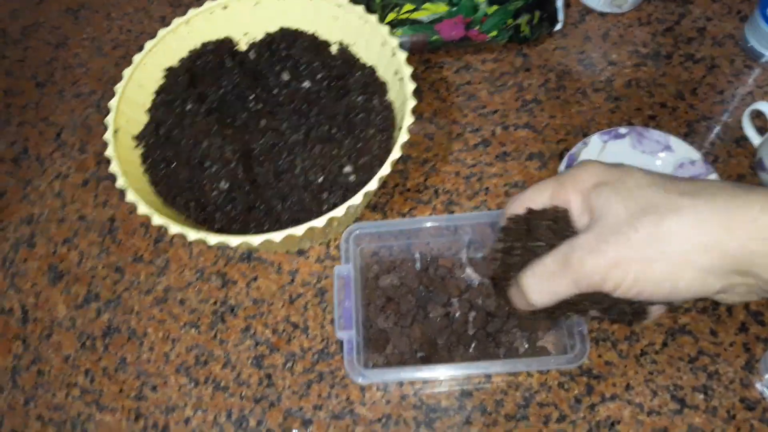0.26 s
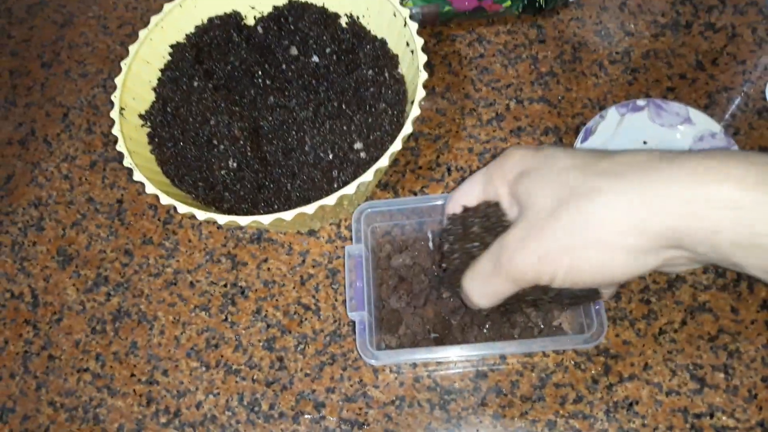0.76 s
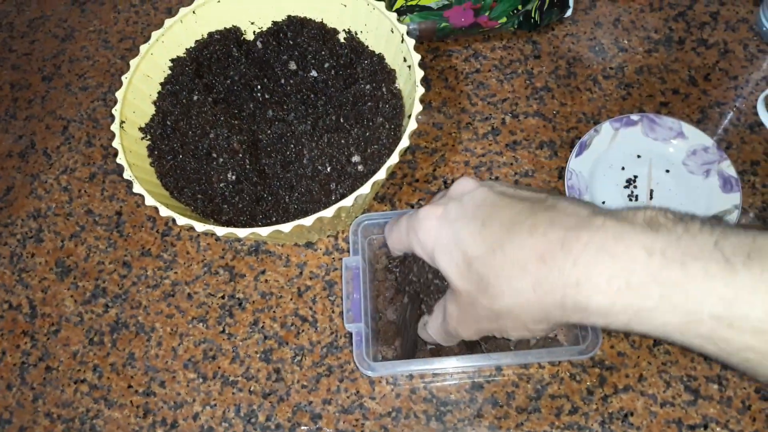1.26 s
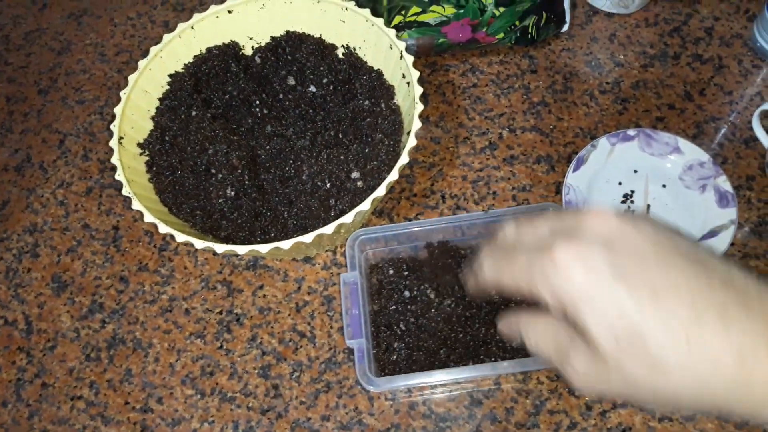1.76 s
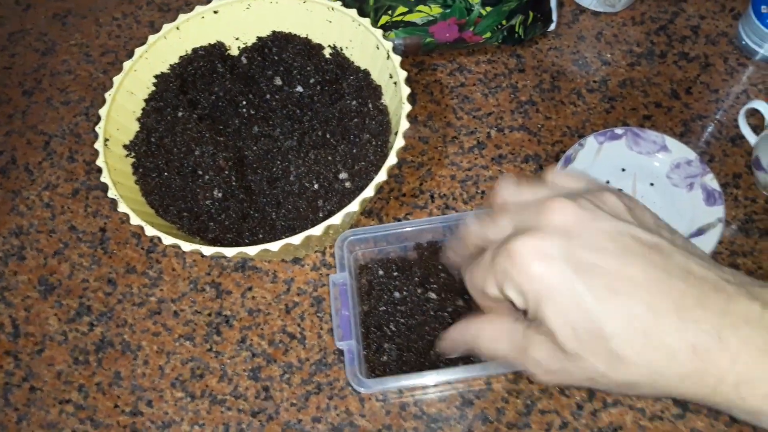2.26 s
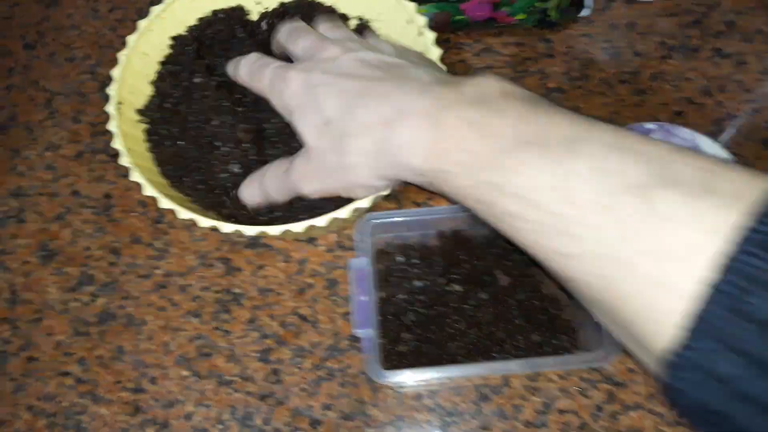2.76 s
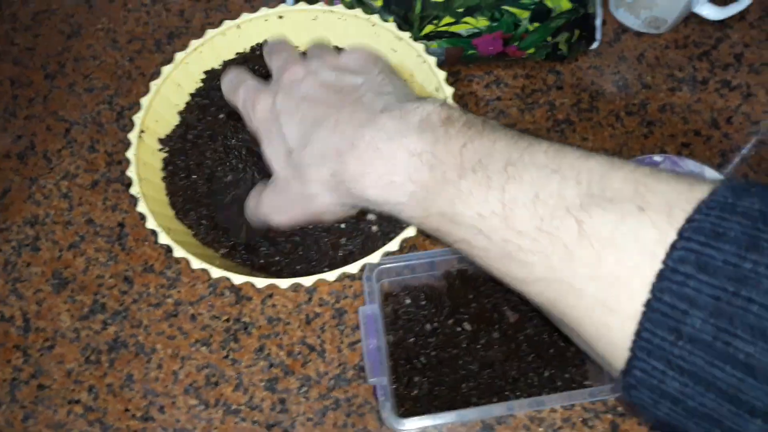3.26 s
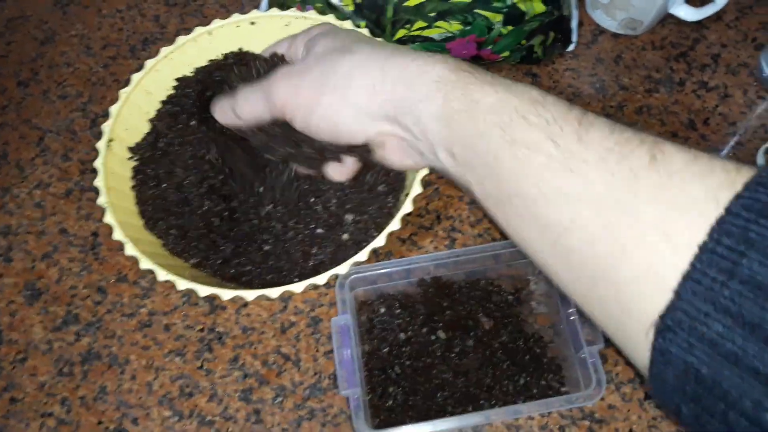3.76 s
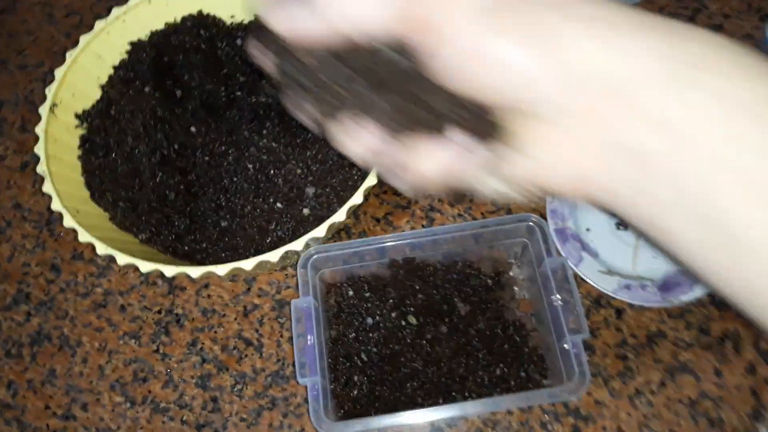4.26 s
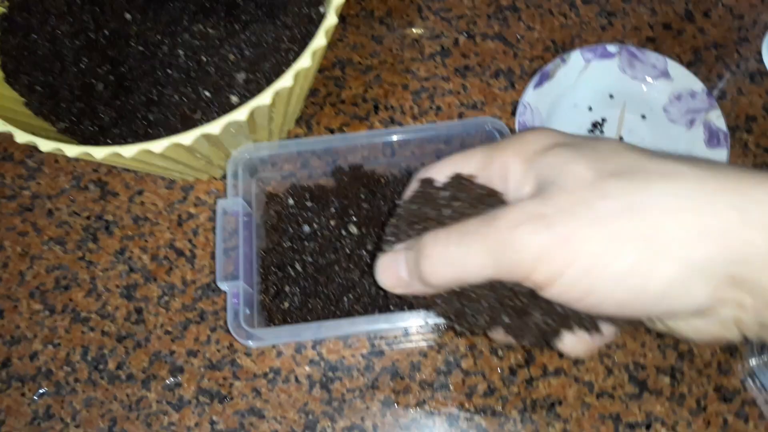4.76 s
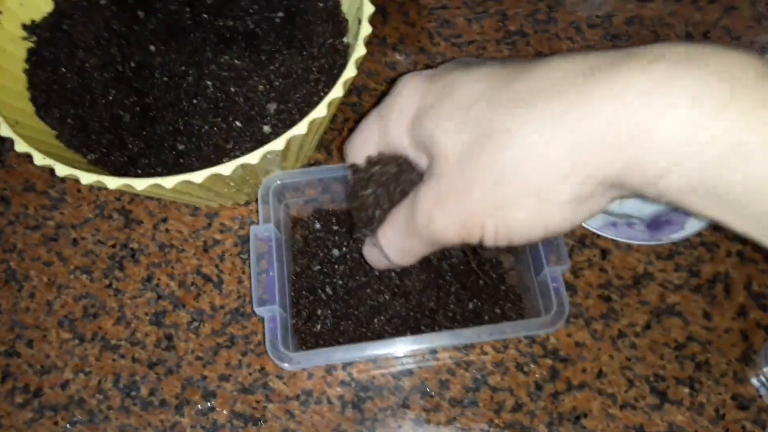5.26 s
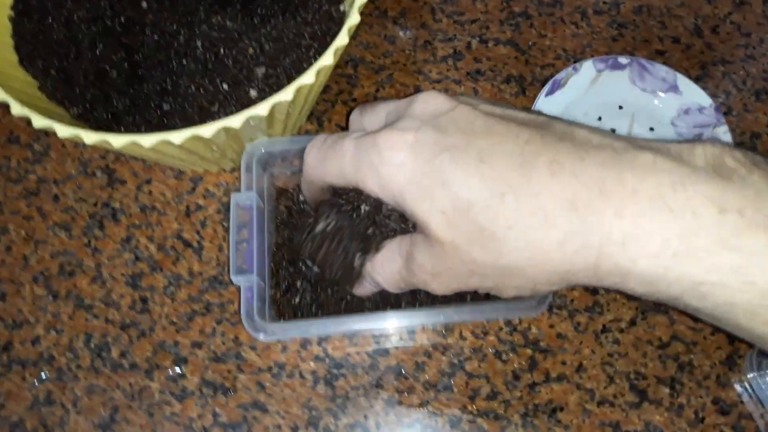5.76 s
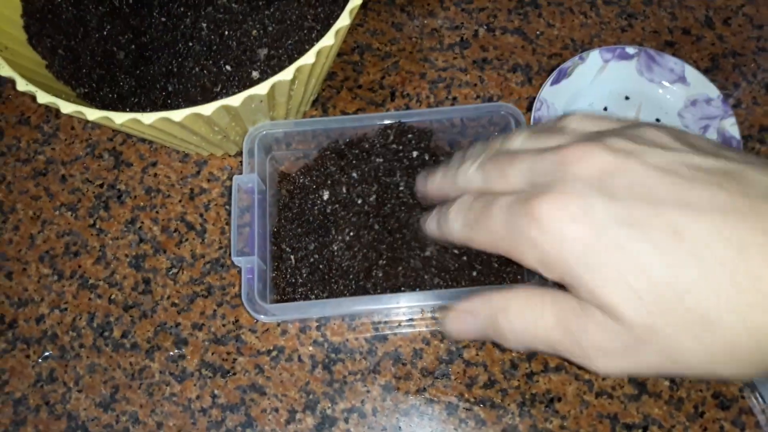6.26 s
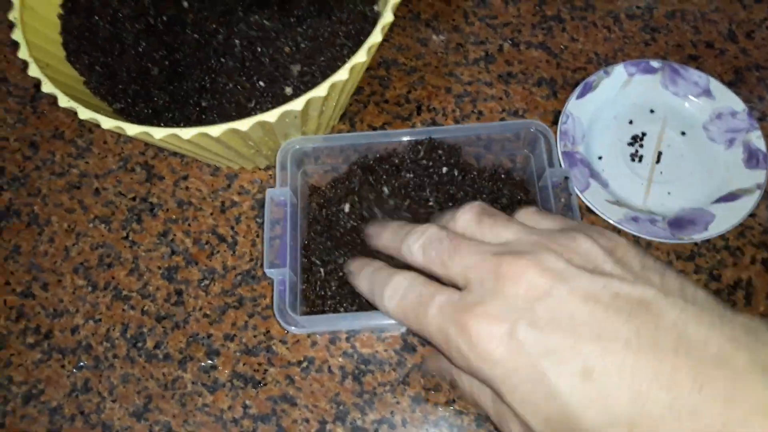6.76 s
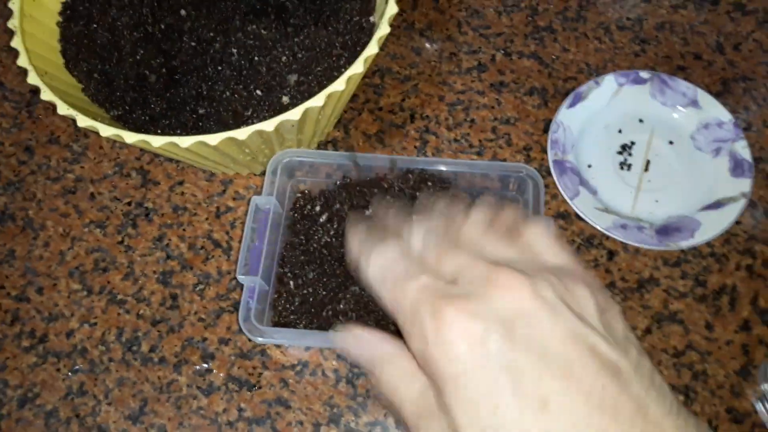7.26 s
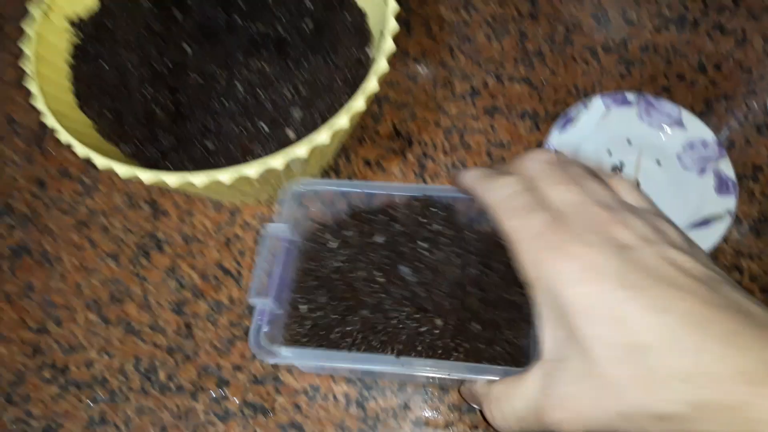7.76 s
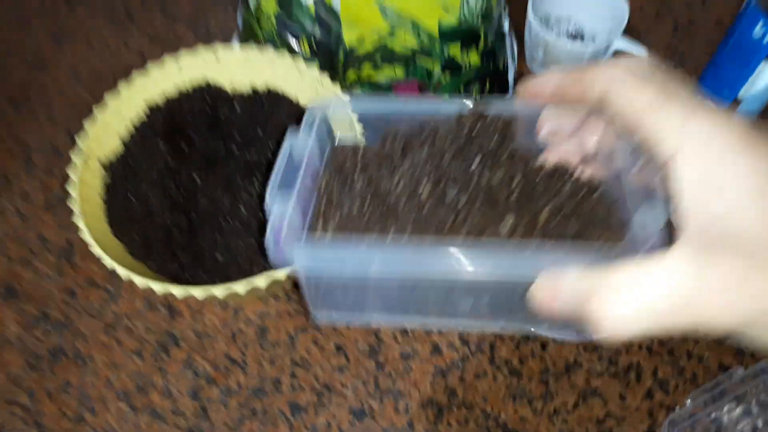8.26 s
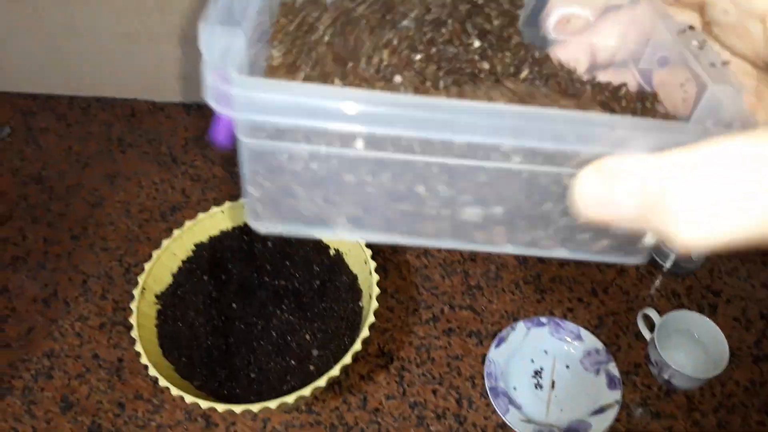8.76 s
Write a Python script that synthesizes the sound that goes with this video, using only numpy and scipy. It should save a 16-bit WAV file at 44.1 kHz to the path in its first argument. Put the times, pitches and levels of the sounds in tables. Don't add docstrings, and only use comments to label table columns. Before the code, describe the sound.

Dry clods crackle and patter against thin plastic, pause, crunch under digging fingers, and finally rattle hard in a lifted box, with low hum behind.

```python
import sys
import numpy as np
from scipy import signal
from scipy.fft import rfft, irfft, next_fast_len
from scipy.io import wavfile
from scipy.ndimage import uniform_filter1d, map_coordinates

SR = 44100
rng = np.random.default_rng(int(sys.argv[2]) if len(sys.argv) > 2 else 0)


def ratio_of_db(decibels):
    return 10 ** (np.asarray(decibels, float) / 20)


def master_out(mix):
    frames = np.transpose(np.atleast_2d(mix))
    ceiling = np.clip(frames, -1, 1)
    pcm = np.round(ceiling * 32767).astype(np.int16)
    wavfile.write(sys.argv[1], SR, pcm)


N = 397341

# (centre [Hz], width [Hz], level [dB])
WALL_MODES = [(807, 420, 0), (1050, 240, 5.5), (1237, 180, 3), (1390, 180, 2), (1639, 340, -2),
              (1926, 213, -3), (2130, 69, -9.5)]
# (frequency [Hz], level [dB per Hz])
GRIT_SPECTRUM = [(700, -54), (1500, -14.5), (2200, -12), (3000, -15), (4200, -8), (5000, -7.5),
                 (6200, -17.5), (9000, -31.5), (14000, -47)]
# (frequency [Hz], level [dB per Hz])
LOAD_SPECTRUM = [(700, -10.5), (1400, -7.5), (2100, 4), (2900, -1.5), (4200, -2), (5200, -6), (6500, -11.5),
                 (9000, -17.5), (14000, -84)]
# (frequency [Hz], level [dB per Hz])
SAND_SPECTRUM = [(3000, -32), (6000, 4), (7400, 7), (8400, 10), (9600, -4.5), (12000, -3), (15500, -3.5),
                 (20000, 9.5)]


def soil():
    impacts = patchy(grains(spread_db=3.2, clump_db=2.2, count=4), depth_db=2.4)
    showers, cracks, rings = clods()
    slump = shakes()
    force = np.hypot(stream(), showers) * impacts[:3] + cracks
    walls = filtered(force[0] + slump[0] * impacts[0], modes(WALL_MODES))
    grit = signal.fftconvolve(force[1], causal(GRIT_SPECTRUM))[:N]
    load = signal.fftconvolve(slump[1] * impacts[3], causal(LOAD_SPECTRUM))[:N]
    sand = signal.fftconvolve(force[2] + slump[2] * impacts[2], causal(SAND_SPECTRUM))[:N]
    stiff_hz = 740
    box = filtered(ratio_of_db(-3.0) * walls + rings + pebbles(),
                   lambda f: -f * f / (stiff_hz ** 2 - f * f + 1.3j * f * stiff_hz))
    return box + ratio_of_db(-3.5) * grit + ratio_of_db(0.06) * load + ratio_of_db(7.5) * sand


def grains(spread_db, clump_db, count):
    sizes = ratio_of_db(spread_db * np.minimum(rng.exponential(size=N), 7))
    clumps = slow_noise(200)
    return unit(rng.standard_normal((count, N)) * sizes * ratio_of_db(clump_db * clumps))


def patchy(x, depth_db):
    z = signal.stft(x, nperseg=256)[2]
    field = uniform_filter1d(rng.standard_normal(z.shape), size=4, axis=-2)
    field = uniform_filter1d(field, size=8, axis=-1)
    return unit(signal.istft(z * ratio_of_db(depth_db * unit(field)), nperseg=256)[1][..., :N])


# (peak time [s], grit level [dB], 20 dB rise [s], 20 dB fall [s], wall drumming [dB re grit])
SLIDES = [(.306, -70, -0.14, 0.1, 15), (1.3, -52.5, -0.44, 0.17, 9.5), (1.522, -37, -0.01, 0.0265, -17.5),
          (1.718, -59.5, 0.24, 0, 13), (1.88, -66, 1.5, -0.97, -54), (2.09, -74.5, -1, 0.1, -10),
          (2.39, -80, -1.5, -0.5, 1), (5.826, -55.5, 0.09, 0.07, 10), (5.922, -65, -0.5, -1.4, -5),
          (6.046, -69, -1.8, 0.9, -6), (6.3, -61.5, 3, 0.28, -3), (6.446, -65, -1.9, -0.04, -21),
          (6.62, -74, -1.5, -1.5, -2), (6.848, -39.5, 0.04, 0.234, -5), (6.984, -46, -0.03, 0.09, -2),
          (7.015, -35.5, 0.05, 0.017, -3), (7.078, -52, -0.15, -0.26, 17), (7.165, -51, -0.3, 0.05, -12),
          (7.204, -71, -1.9, 1, -2.5), (7.274, -73, -1.7, -0.5, -27)]
# (peak time [s], grit level [dB], rise [s], fall [s], wall drumming [dB re grit])
RATTLES = [(7.756, -49.5, 0.053, 0.19, -10), (7.892, -56, 0.16, 0.061, -4), (8.03, -46, 0.046, 0.084, -13),
           (8.33, -57, 0.17, 0.14, 2), (8.666, -39.5, .015, .02, -4), (8.415, -60.5, 0.045, 0.036, 6),
           (8.785, -26, 0.0096, 0.022, -8), (8.905, -37.5, 0.027, 0.018, -16), (8.96, -39.5, 0.018, .02, 9),
           (8.468, -75, .15, 0.21, -15), (8.616, -52, 0.11, 0.34, -34), (8.842, -40.5, 0.099, 0.52, -47)]
# (peak time [s], grit level [dB], rise [s], fall [s], wall drumming [dB re grit])
SIFTING = [(.015, -58, 0.0076, 0.082, -4), (7.012, -49, .02, 0.032, 12), (2.276, -64, 0.006, 0.059, -6),
           (2.362, -72, 0.0071, 0.27, -18), (2.745, -60, 0.021, 0.15, -19), (3.22, -66, .02, 0.11, -4),
           (3.364, -66, 0.12, 0.067, -10), (3.4, -71.5, 0.061, 0.13, 5), (3.514, -56.5, 0.052, 0.038, 9),
           (3.58, -74, 0.11, 0.087, -2), (3.756, -79.5, 0.09, 0.079, 11), (4.73, -64.5, 0.075, 0.11, -7),
           (4.812, -65.5, 0.0088, 0.081, -5), (4.985, -69, 0.062, 0.092, 0), (5.44, -85, 0.038, 0.1, -26),
           (5.325, -69.5, 0.065, 0.2, -9), (5.1, -81, 0.23, 0.55, -30), (5.566, -83, 0.16, 0.06, 4),
           (5.666, -66.5, 0.022, 0.057, -13)]


def stream():
    rate = SR // 20
    crest = 0.18
    gains = np.zeros((3, N // 20 + 2 * rate))
    t = np.arange(-rate // 2, rate) / rate
    for rows, sand_db in ((SLIDES, -8.5), (RATTLES, -16.5), (SIFTING, -6.5)):
        for s, db, rise, fall, wall_db in rows:
            distance = np.maximum(-t / max(rise, .003), t / max(fall, .003))
            surge = ratio_of_db(db + 20 * crest - 20 * np.hypot(crest, distance))
            gains[:, round(s * rate):][:, :len(t)] += ratio_of_db([[wall_db], [0], [sand_db]]) * surge
    steps = np.repeat(gains[:, rate // 2:], 20, axis=1)
    return uniform_filter1d(steps, size=20, axis=1)[:, :N]


# (time [s], peak level [dB], rise [s], T60 [s])
SHAKES = [(8.343, -38.5, 0.023, 0.087), (8.373, -33, .005, 0.086), (8.435, -27, 0.015, 0.15),
          (8.486, -25, 0.0088, 0.09), (8.556, -29.5, 0.03, 0.063), (8.598, -18.5, 0.0072, 0.077),
          (8.6715, -19, 0.0055, 0.072), (8.7167, -19, 0.003, 0.081), (8.791, -13, 0.011, 0.051),
          (8.8432, -13.5, 0.0012, 0.075), (8.9128, -12, 0.015, 0.044), (8.965, -13, 0.003, 0.068)]


def shakes():
    t = np.arange(SR // 4) / SR - .02
    gains = np.zeros((3, N + SR))
    for s, db, rise, t60 in SHAKES:
        wall_db, sand_db = -1.5, 0.35 * db - 14.5
        start = round((s + t[0]) * SR)
        after = np.maximum(t + 0.52 * rise, 0)
        settle = ratio_of_db(-60 * (after / max(t60, .02)) ** 1.23)
        swell = (1 - np.exp(-(after / max(rise, .0005)) ** 2)) * settle
        slide = ratio_of_db(-17.0 - 1200 * abs(t))
        share = ratio_of_db(db - 6.0 + np.array([[wall_db], [0], [sand_db]]))
        gains[:, start:start + len(t)] += share * (swell / swell.max() + slide)
    return gains[:, :N]


def clods():
    t = np.arange(SR // 4) / SR
    showers, cracks, rings = np.zeros((3, N + SR)), np.zeros((3, N + SR)), np.zeros(N + SR)
    for s, db, wall_db, sand_db, hz, t60 in strikes():
        at = slice(round(s * SR), round(s * SR) + len(t))
        share = ratio_of_db(db + np.array([[wall_db], [0], [sand_db]]))
        life = max(t60, .01) * np.array([[1.2], [1.01], [.8]])
        shower = ratio_of_db(-13.0 - 40 * t / life) / (1 + t / 0.024)
        crack = (ratio_of_db(-60 * t / .002) + ratio_of_db(-13 - 60 * t / 0.025)) * rng.standard_normal(len(t))
        crack[0] = 3.2
        crack *= ratio_of_db(14.0 - 63.0 * t60) / np.linalg.norm(crack)
        showers[:, at] += share * shower
        cracks[:, at] += share * crack
        crumbs = crack + 0.43 * shower[1] * rng.standard_normal(len(t))
        ring = ratio_of_db(-t[:400] * (2 * hz + 4000)) * np.sin(2 * np.pi * hz * t[:400])
        ring /= np.linalg.norm(ring)
        rings[at] += ratio_of_db(db + max(wall_db, 0) + 1.5) * np.convolve(crumbs, ring)[:len(t)]
    return showers[:, :N], cracks[:, :N], rings[:N]


# (time [s], peak level [dB], wall knock [dB re peak], ring [Hz], shower T60 [s])
CRUMBLING = [(.3027, -35, 0.5, 715, 0.23), (0.3083, -34, -40, 2100, 0.19), (1.275, -20, -3.5, 4170, 0.2),
             (1.3146, -19, -30.5, 4000, 0.033), (1.3249, -24, -9, 3960, 0.068),
             (1.3664, -18.5, -7, 1750, 0.18), (1.416, -23, -16, 3780, 0.11), (1.4344, -29, -10, 4080, 0.44),
             (1.4845, -28.5, -21, 4000, 0.24), (1.499, -36, -13, 4750, 0.22),
             (1.507, -26.5, -32.5, 5070, 0.25), (1.5848, -24.5, -8, 4700, 0.09),
             (1.6465, -37, -4, 1880, 0.05), (1.6591, -20, -7, 1010, 0.055), (1.7145, -36, 2, 4460, 0.27),
             (1.7723, -29.5, -19, 5350, 0.44), (1.7801, -27.5, -8, 4860, 0.12),
             (1.8127, -22, -23, 4900, 0.036), (2.107, -35.5, -30, 2040, 0.23), (2.108, -47, -30, 3200, .2),
             (2.113, -53, -30, 5300, .1), (2.805, -31, -19, 2380, 0.15), (3.1604, -31.5, -1, 677, 0.088),
             (3.497, -45, -1, 940, 0.08)]
SPREADING = [(4.811, -53.5, 4.5, 1250, .45), (5.739, -57.5, 24, 786, 0.09), (5.7903, -40.5, -3, 5100, 0.43),
             (5.8483, -30.5, -23, 5200, 0.03), (5.901, -27, -12, 980, 0.057), (5.9166, -31, -3, 2820, 0.1),
             (6.008, -63, 20, 945, 0.061), (6.0296, -30, 11.5, 770, 0.034), (6.118, -35.5, -15, 5440, 0.17),
             (6.1383, -45, -9, 5140, 0.071), (6.1678, -28.5, -1.5, 4740, 0.04),
             (6.209, -36.5, -25, 2540, 0.22), (6.2505, -32.5, -2, 4950, 0.18),
             (6.2558, -25.5, -8, 4570, 0.077), (6.277, -27.5, -33, 2760, 0.047),
             (6.295, -32, -25, 3640, 0.06), (6.329, -35, -24, 2820, 0.082), (6.418, -38, -4.5, 5040, 0.065),
             (6.5335, -35, -26, 5000, 0.079), (6.555, -31.5, 2, 4770, 0.22)]
PATTING = [(6.796, -42, -17, 2310, 0.24), (6.8164, -34, -1, 1340, 0.28), (6.84, -32, -11, 3780, 0.19),
           (6.8682, -29, 2, 4940, 0.18), (6.9012, -31, 1.5, 1390, 0.11), (6.9422, -19, -21, 4400, 0.23),
           (6.9627, -20, -6, 4300, 0.14), (7.0, -25, -3, 1230, 0.097), (7.0196, -32, -1, 1230, 0.08),
           (7.0592, -15.5, -45, 1060, 0.11), (7.1695, -31, -28, 4130, 0.071), (7.182, -28, -7, 4480, 0.14),
           (7.1902, -20, -3.5, 1050, 0.15), (7.2876, -62, -10, 1080, 0.077)]
LIFTING = [(7.7147, -37.5, -4, 1390, 0.1), (7.74, -32, -0.5, 3880, 0.44), (7.823, -24, 1, 1050, 0.11),
           (7.9658, -13, -17, 1010, 0.19), (8.0045, -21, 8, 1110, 0.071), (8.0132, -25.5, 6.5, 1050, 0.058),
           (8.022, -17, -25, 2490, 0.2), (8.081, -28.5, 9, 1120, 0.2), (8.1067, -48, 21, 960, 0.023),
           (8.127, -40, -15, 3900, .03), (8.138, -40, 7.5, 3800, 0.1), (8.2454, -18.5, -11, 990, 0.077),
           (8.468, -19, -26, 1050, 0.053), (8.6, -19, -18, 2270, 0.14), (8.7155, -16.5, -19, 920, 0.13),
           (8.8437, -3, -2, 1120, 0.084), (8.9676, -15, -15, 1130, 0.019)]
DRYNESS = (0.42, 0.5, 2, 1.6)
# (ring [Hz], level [dB re peak])
SAND_BY_RING = [(800, -17.5), (2500, -18.5), (4000, -14.5), (4700, -6), (5300, -3.5)]
# (time [s], peak level [dB])
SPECKS = [(.463, -59), (1.566, -44), (1.695, -54), (1.73, -52), (2.9467, -51), (5.558, -62), (5.64, -68),
          (5.874, -46), (5.893, -43.5), (6.19, -60), (7.288, -61), (7.342, -70), (7.366, -62),
          (7.4691, -50), (7.631, -69), (7.673, -63)]


def strikes():
    rows = []
    for table, dry_db in zip((CRUMBLING, SPREADING, PATTING, LIFTING), DRYNESS):
        for s, db, wall_db, hz, t60 in table:
            sand_db = along(SAND_BY_RING, hz) + dry_db - max(wall_db, 0)
            rows.append((s, db, wall_db, sand_db, hz, t60))
    return rows + [(s, db, -41, 8, 4570, 0.12) for s, db in SPECKS]


# (time [s], peak level [dB], click [Hz], wall knock [dB re peak])
PEBBLES = [(1.2755, -22, 4500, -18), (1.3245, -25, 4000, -21), (1.367, -19.5, 1820, -12),
           (1.535, -29, 1980, -12), (1.6595, -20, 680, -4), (1.7805, -24.5, 1750, -9),
           (1.8122, -18, 4950, -26), (2.1005, -49, 4600, -20), (2.79, -31, 3800, -20),
           (2.887, -26, 6500, -20), (3.052, -22.5, 3660, -8), (4.812, -42, 4100, -15),
           (5.74, -44, 1500, -2), (5.903, -36, 1100, -10), (6.0305, -22, 744, 5), (6.943, -22.5, 2200, -15),
           (7.0595, -9.5, 4800, -18), (7.0615, -20, 2100, -8), (7.1903, -12, 3900, 1.5),
           (7.8235, -28, 2320, -12), (7.9677, -16.5, 3900, -11), (7.983, -26.5, 1300, 17),
           (8.012, -22.5, 3570, -5), (8.028, -17.5, 1410, 1), (8.032, -29, 4200, -4),
           (8.0755, -40, 7000, -18), (8.094, -32, 1400, -6), (8.2432, -16.5, 4330, -20),
           (8.3739, -24, 1360, 8), (8.453, -40, 2220, -20), (8.4685, -13, 4520, -0.5),
           (8.488, -23, 2200, 7), (8.498, -25.5, 1120, 6), (8.563, -25, 3000, -5), (8.607, -15.5, 2130, 2),
           (8.62, -21, 5930, -15), (8.626, -36, 4400, -12), (8.6715, -13, 4250, -10),
           (8.7144, -14.5, 3500, -6), (8.723, -20, 1250, 3), (8.73, -23, 2100, -1), (8.79, -7.5, 4220, 2),
           (8.796, -29, 1890, -5), (8.805, -14, 1100, 3), (8.8435, -5, 5050, 7.5), (8.8459, -7.5, 1820, 6),
           (8.849, -22, 4600, 9), (8.856, -8.5, 1190, 0), (8.9127, -13, 1050, -19), (8.918, -5.5, 4200, 0),
           (8.9676, -12.5, 3500, 3), (8.973, -26, 4500, -8)]


def pebbles():
    clicks, knocks = np.zeros(N + SR), np.zeros(N + SR)
    t = np.arange(SR // 50) / SR
    for s, db, hz, wall_db in PEBBLES:
        click = ratio_of_db(-30 * t * hz / 3.8) * np.cos(2 * np.pi * hz * t)
        grit = ratio_of_db(-32.5 - 60 * t / 0.0064) * rng.standard_normal(len(t))
        clicks[round(s * SR):][:len(t)] += ratio_of_db(db) * (click + grit)
        knocks[round(s * SR)] -= ratio_of_db(db + wall_db + 3.5)
    return clicks[:N] + filtered(knocks[:N], modes(WALL_MODES))


# (time [s], crunch level [dB])
DIGGING = [
    (2.7, -83),
    (2.824, -42),
    (2.914, -47),
    (2.93, -51.5),
    (3.018, -43),
    (3.094, -38.5),
    (3.158, -44),
    (3.224, -69.5),
    (3.28, -88),
]
# (frequency [Hz], level [dB per Hz])
CRUNCH_SPECTRUM = [(530, -52), (900, 0), (1510, -9), (2330, -3), (2930, -4), (6180, -13.5), (7860, -10.5),
                   (10000, -21.5), (15100, -23), (16000, -16)]
# (centre [Hz], width [Hz], level [dB])
POT_MODES = [(189, 58, -2.5), (307, 220, -7), (650, 120, 2), (800, 393, -6.5)]


def digging():
    fade, (crunch_db,) = curves(DIGGING)
    pot_db = 2.5 + 19 * np.clip(np.arange(N) / SR - 3.0, -1, 1)
    crunch, drum = fade * ratio_of_db(crunch_db) * grains(spread_db=2.4, clump_db=1.9, count=2)
    crunch = signal.fftconvolve(crunch, causal(CRUNCH_SPECTRUM))[:N]
    return crunch + filtered(ratio_of_db(pot_db) * drum, modes(POT_MODES))


# (time [s], peak level
# [dB], pitch [Hz], T60 [s])
TAPS = [(1.302, -36, 1660, 0.034), (1.325, -32, 2550, 0.057), (1.4165, -27, 5600, 0.014),
        (1.4355, -35, 4030, 0.012), (1.4835, -41, 4500, 0.0092), (1.508, -31, 4270, 0.019),
        (1.515, -30, 7660, 0.014), (1.524, -31, 4830, 0.014), (1.535, -32, 5330, .01),
        (1.568, -44, 4800, 0.017), (1.646, -36, 4800, .01), (1.6595, -28, 4970, 0.013),
        (1.694, -40, 5300, .015), (1.7035, -37, 5200, .015), (1.73, -38, 4800, 0.013),
        (1.78, -23.5, 4900, .015), (1.8126, -31, 1920, 0.016), (2.1, -44, 4600, .02),
        (2.107, -53, 5350, .05), (2.115, -53, 2930, 0.13), (2.275, -68, 1970, 0.087),
        (2.806, -34, 5300, .01), (4.816, -65, 1290, .25), (5.791, -45, 5030, 0.037),
        (6.018, -34, 950, 0.016), (6.03, -21.5, 763, 0.023), (6.139, -42, 5160, .02),
        (6.558, -35, 4780, .02), (6.87, -35, 4930, .02), (6.871, -32, 3350, .02), (6.901, -38, 5040, 0.014),
        (6.9664, -27.5, 4190, 0.026), (7.001, -26.5, 3660, .02), (7.0605, -21, 1016, 0.034),
        (7.063, -31, 2196, 0.068), (7.075, -36, 1033, 0.063),
        (7.9661, -14, 946, 0.019), (7.974, -23, 880, 0.026), (8.0154, -19, 1090, 0.024),
         (8.107, -24, 940, .02), (8.2431, -20, 970, 0.023), (8.4685, -18, 1007, 0.047),
         (8.679, -31, 1050, 0.025), (8.7155, -26.5, 965, 0.042), (8.724, -21, 1084, .03),
         (8.7921, -18, 962, .06), (8.8437, -12, 1970, 0.027), (8.9123, -18.5, 1050, .05),
         (8.9227, -21, 1010, 0.043), (8.968, -18.5, 988, 0.047)]


def taps():
    out, t = np.zeros(N + SR), np.arange(SR // 8) / SR
    attack = 1 - np.exp(-t / 0.00044)
    for s, db, hz, t60 in TAPS:
        pair = np.sin(2 * np.pi * hz * t) + ratio_of_db(-8) * np.sin(2 * np.pi * 1.13 * hz * t)
        wander = uniform_filter1d(rng.standard_normal(len(t)), size=int(3 * SR / hz))
        rough = 1 + .6 * unit(wander)
        out[round(s * SR):][:len(t)] += ratio_of_db(db - 60 * t / max(t60, .004)) * attack * pair * rough
    return out[:N]


# (time [s], peak level [dB], pitch [Hz])
THUMPS = [(0.304, -36.5, 303), (1.275, -38.5, 510), (1.415, -39.5, 460), (1.656, -30, 408),
          (6.027, -37, 383), (7.189, -34.5, 508), (7.966, -31, 298), (8.027, -30.5, 320), (7.003, -32, 513),
          (8.2435, -33.5, 555), (8.467, -30, 436), (8.844, -31.5, 386), (8.913, -33, 296),
          (8.672, -35, 338)]


def thumps():
    out, t = np.zeros(N + SR), np.arange(SR // 8) / SR
    for s, db, hz in THUMPS:
        puff = uniform_filter1d(rng.standard_normal(len(t)), size=40) * 4.9
        push = (np.sin(2 * np.pi * hz * t) + puff) * (1 - np.exp(-t / 0.00026))
        out[round((s + .002) * SR):][:len(t)] += ratio_of_db(db + 2.0 - 60 * t / 0.061) * push
    return out[:N]


# (time [s], peak level [dB], pitch [Hz])
BUMPS = [
    (3.119, -45.5, 105),
    (7.98, -62, 99),
    (8.04, -48, 100),
]


def counter():
    t = np.arange(N) / SR
    return sum(ratio_of_db(db) * np.exp(-((t - s) / 0.035) ** 2) * np.sin(2 * np.pi * hz * t) for s, db, hz in BUMPS)


# (frequency [Hz], T60 [s])
ROOM_DECAY = [(300, 0.33), (2000, 0.24), (10000, 0.051)]


def room(x):
    hz, t, z = signal.stft(rng.standard_normal(SR // 2), SR, nperseg=256)
    tail = signal.istft(z * ratio_of_db(-60 * t / along(ROOM_DECAY, hz)[:, None]), SR, nperseg=256)[1]
    return signal.fftconvolve(np.pad(x, (200, 0)), tail / np.linalg.norm(tail))[:N]


# (centre [Hz], width [Hz], rms level [dB])
HUM = [(100, 1.5, -58.5), (166.3, 24, -64), (304, 15.8, -68), (491.5, 7.9, -59.5), (520.2, 13.2, -57.5),
       (1223, 160, -83)]
# (frequency [Hz], level [dB per Hz])
AIR = [(15, -41), (40, -27), (80, -16.5), (125, -12), (240, -14.5), (420, -5.5), (600, -13.5), (850, -26),
       (1300, -37), (5000, -35.5), (8500, -42), (10000, -46), (13000, -39), (16500, -36)]


def hum():
    t = np.arange(N) / SR
    (mains_hz, _, mains_db), *casing = HUM
    mains_gain = np.sqrt(2) * ratio_of_db(mains_db + 0.88 * slow_noise(2000))
    out = mains_gain * np.sin(2 * np.pi * mains_hz * t)
    for hz, width, db in casing:
        band = filtered(rng.standard_normal(N), lambda f: 1 / (1 + ((f - hz) / width) ** 4))
        out += ratio_of_db(db) * unit(band)
    air = filtered(rng.standard_normal(N), lambda f: ratio_of_db(along(AIR, f)))
    return out + ratio_of_db(-58) * unit(air)


def unit(x):
    return x / np.sqrt(np.mean(x ** 2) + 1e-20)


def slow_noise(step):
    return map_coordinates(rng.standard_normal(N // step + 4), [np.arange(N) / step])


def along(points, hz):
    f, v = np.transpose(points)
    return np.interp(np.log(hz + 1), np.log(f + 1), v)


def curves(rows):
    t = np.arange(N) / SR
    s, *cols = np.transpose(rows)
    fade = np.clip(np.minimum(t - s[0] + .001, s[-1] - t) / 0.013, 0, 1)
    return fade, [np.interp(t, s, v) for v in cols]


def filtered(x, response):
    m = next_fast_len(N + SR // 2)
    return irfft(rfft(x, m) * response(np.fft.rfftfreq(m, 1 / SR)), m)[..., :N]


def causal(points, size=2048):
    level_db = np.maximum(along(points, np.fft.rfftfreq(size, 1 / SR)), -40)
    cep = irfft(np.log(ratio_of_db(level_db)), size)
    cep[1:size // 2] *= 2
    cep[size // 2 + 1:] = 0
    h = irfft(np.exp(rfft(cep)), size)
    return h / np.linalg.norm(h)


def modes(table):
    def shape(f):
        total = 0
        for k, (centre, width, db) in enumerate(table):
            damping = 1j * f * width
            total = total + (-1) ** k * ratio_of_db(db) * damping / (centre * centre - f * f + damping)
        return total
    scale = np.sqrt(np.mean(abs(shape(np.linspace(1, SR / 2, 4000))) ** 2))
    return lambda f: shape(f) / scale


def scene():
    near = soil() + digging() + thumps() + taps()
    near = filtered(near, lambda f: (1j * f / (163 + 1j * f)) ** 3)
    return (near + ratio_of_db(-13) * room(near) + counter() + hum())[None]


def top_cut(x):
    return signal.sosfilt(signal.butter(12, 16810, fs=SR, output="sos"), x)


def record(dry):
    return top_cut(filtered(dry, lambda hz: hz < 15900))


dry = scene()
out = record(dry)
master_out(out)
```